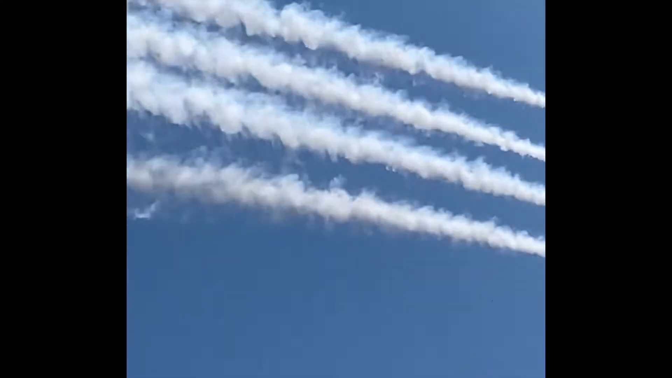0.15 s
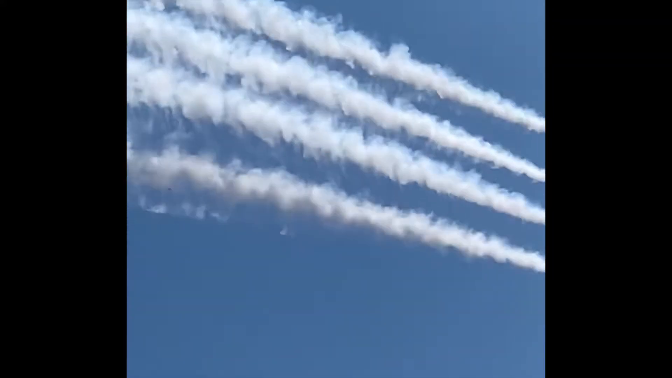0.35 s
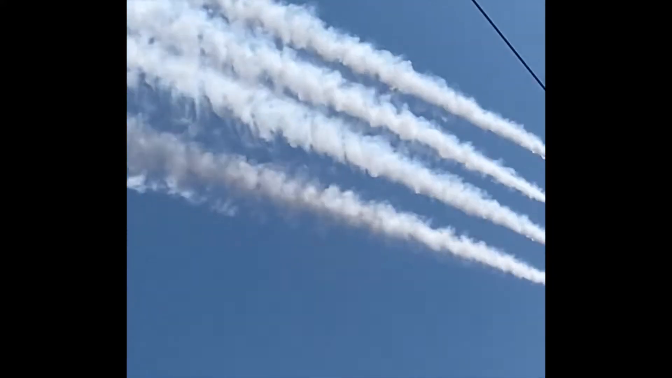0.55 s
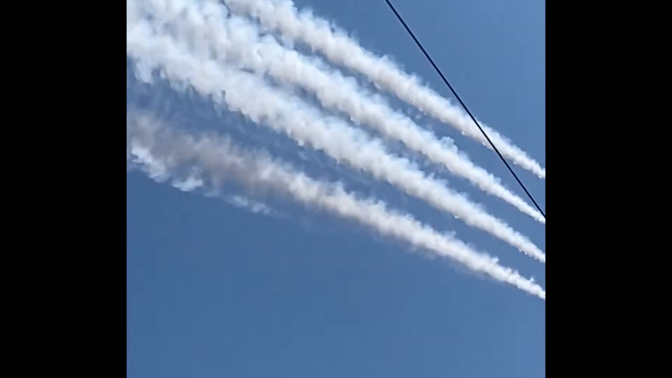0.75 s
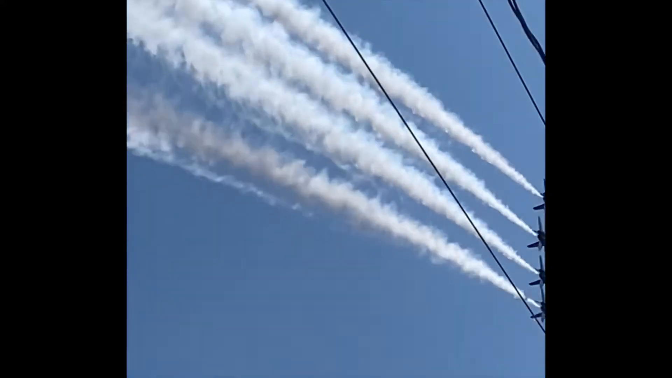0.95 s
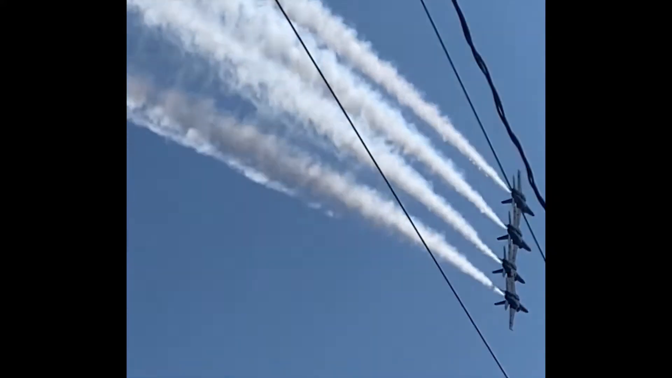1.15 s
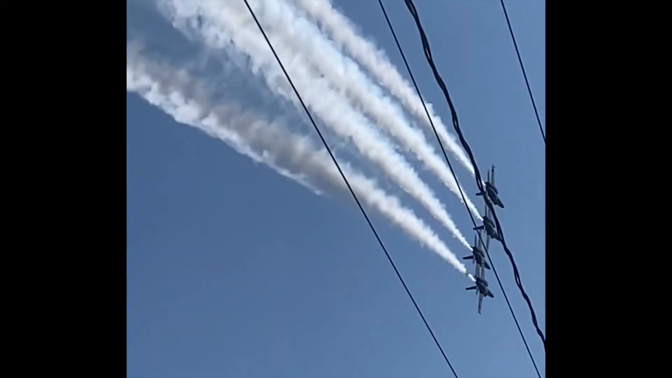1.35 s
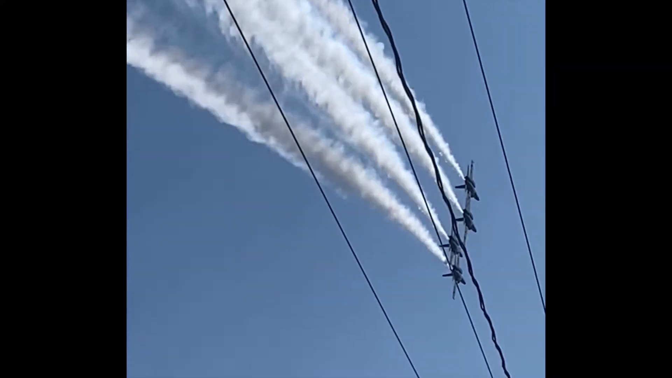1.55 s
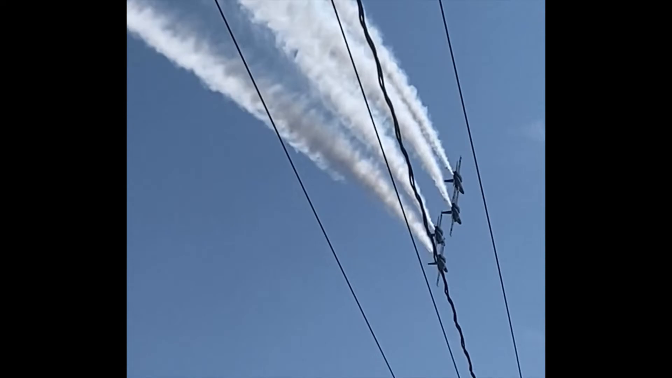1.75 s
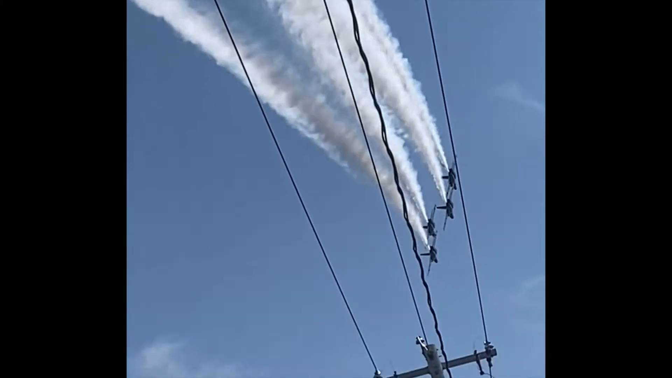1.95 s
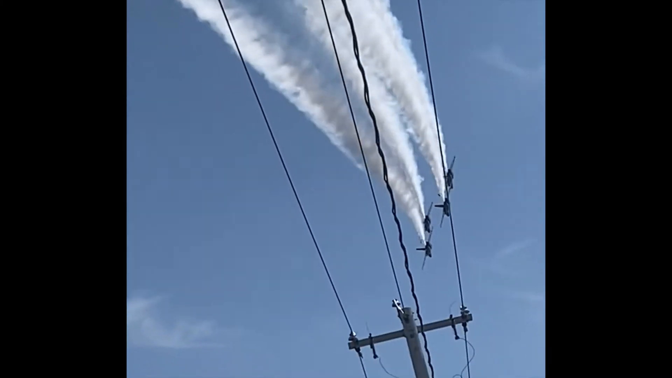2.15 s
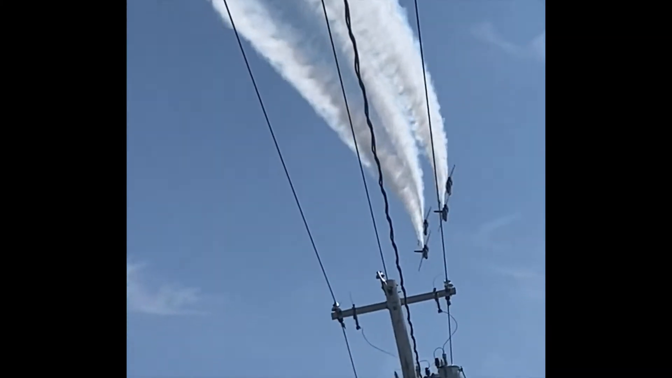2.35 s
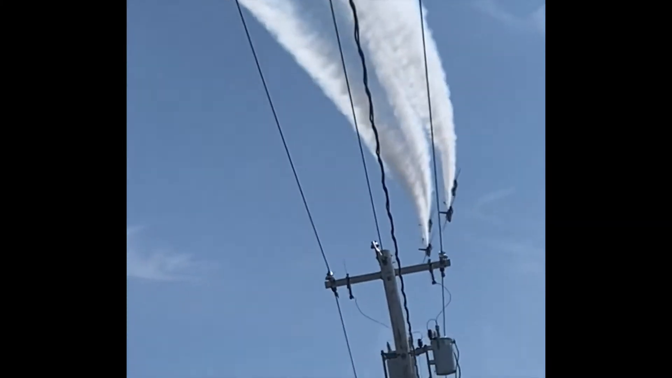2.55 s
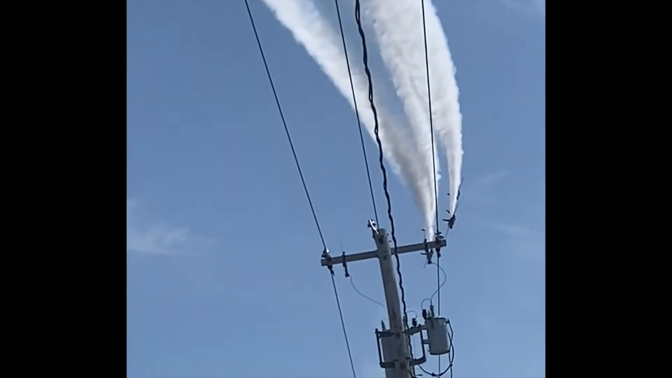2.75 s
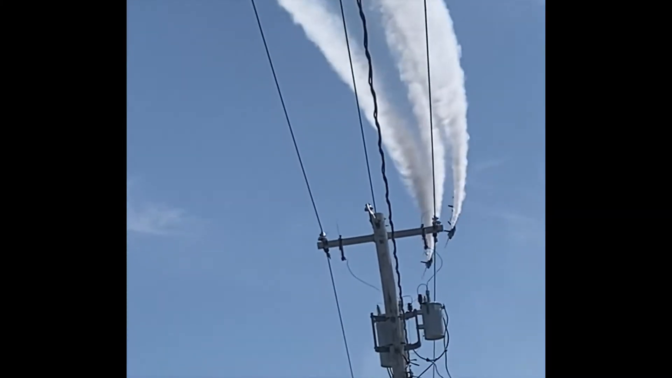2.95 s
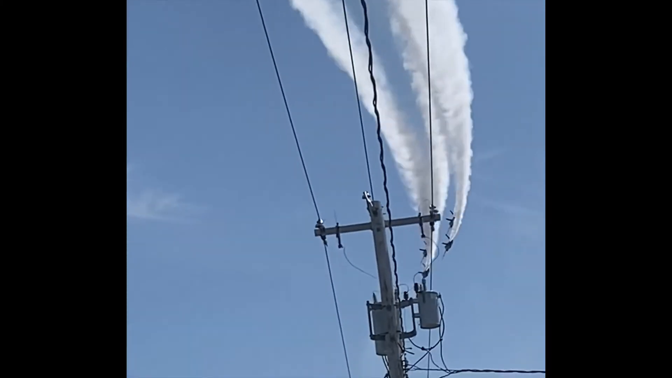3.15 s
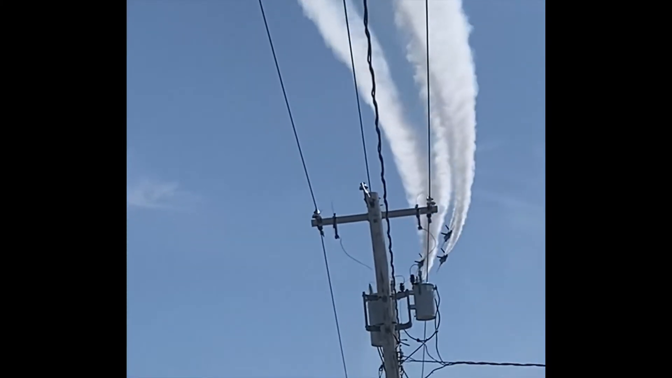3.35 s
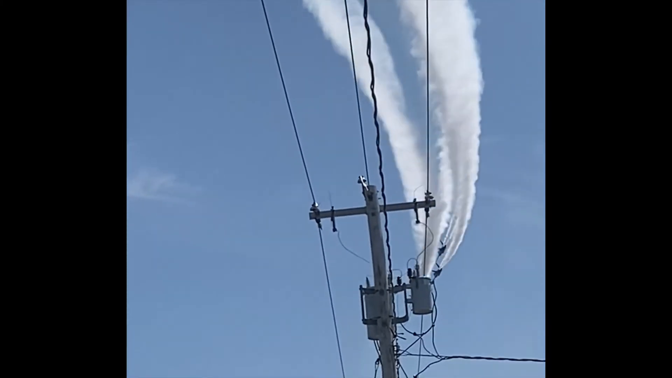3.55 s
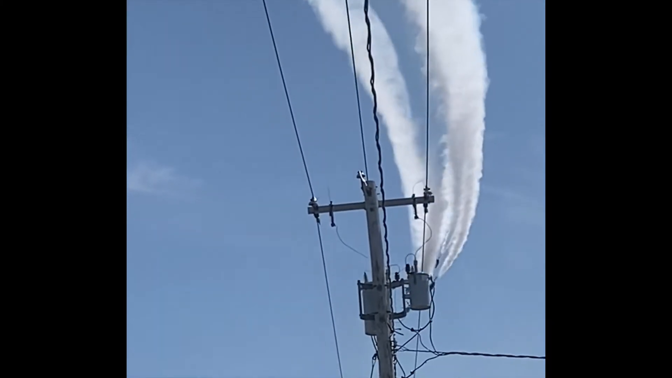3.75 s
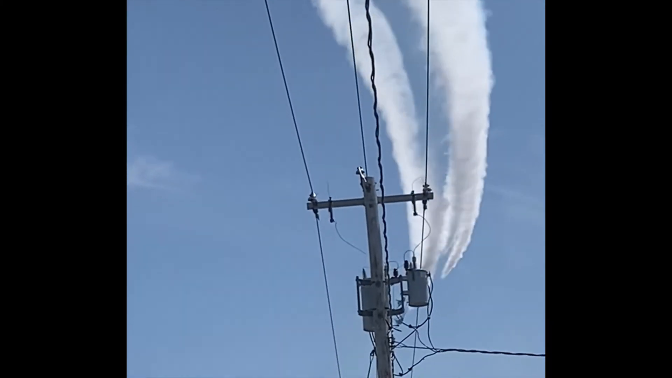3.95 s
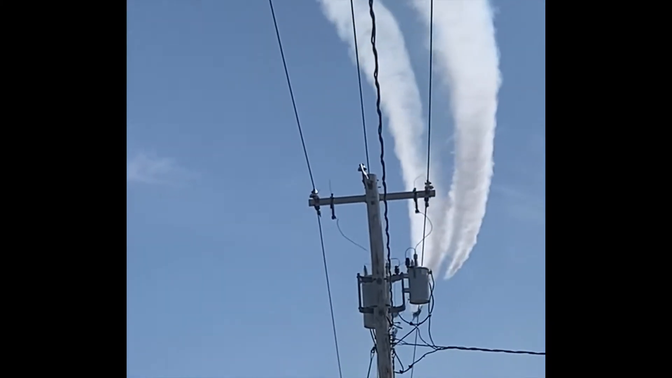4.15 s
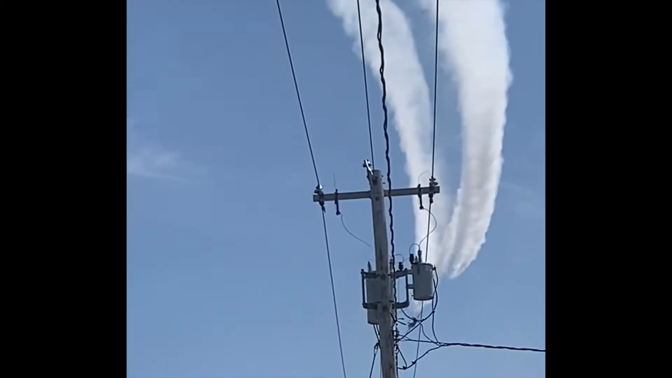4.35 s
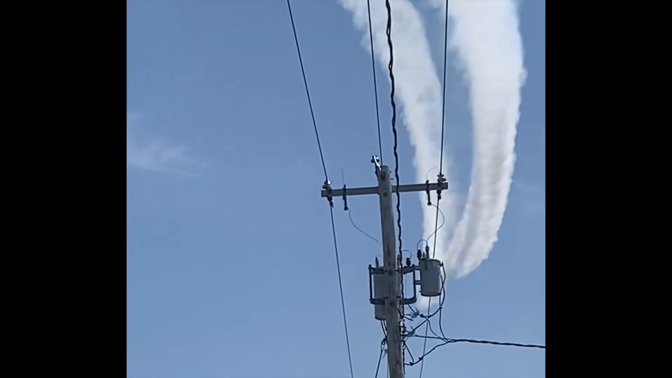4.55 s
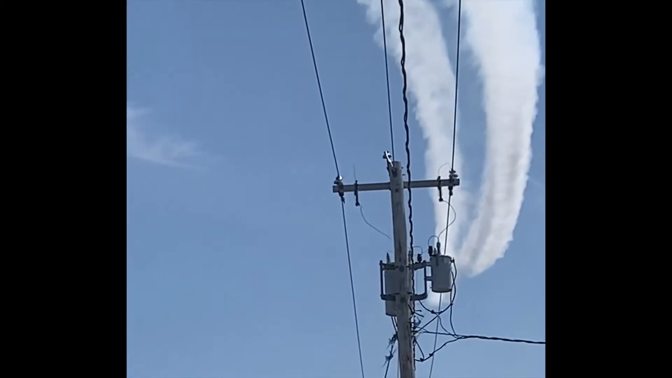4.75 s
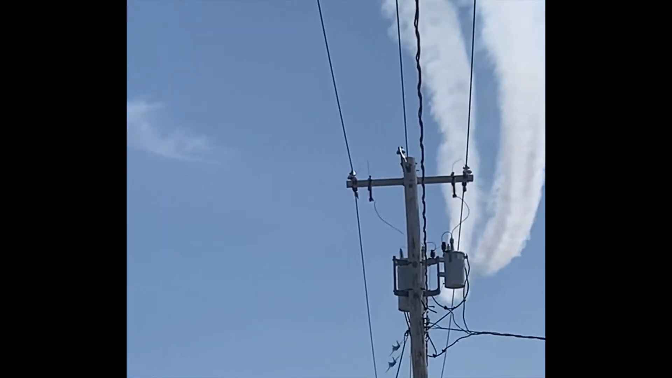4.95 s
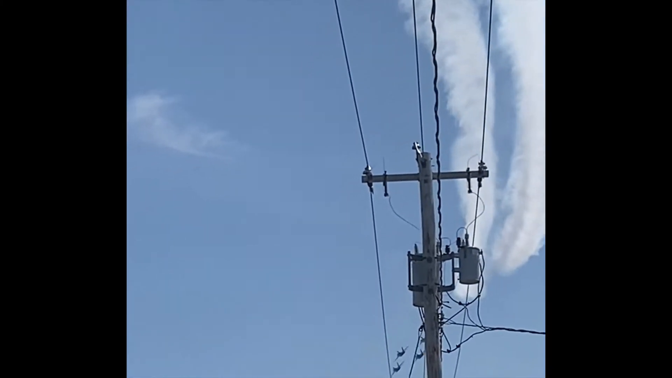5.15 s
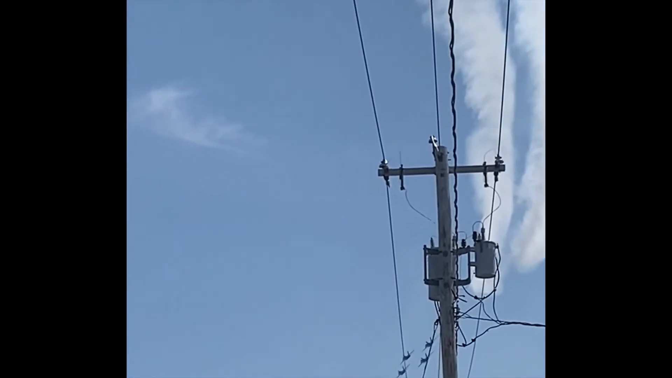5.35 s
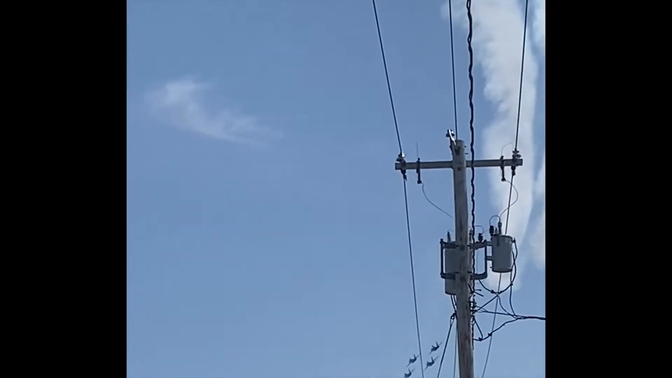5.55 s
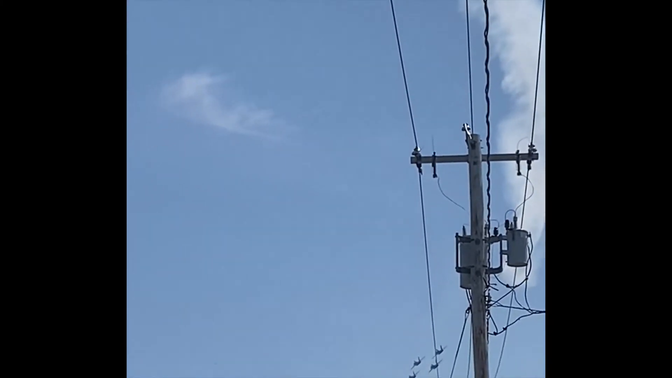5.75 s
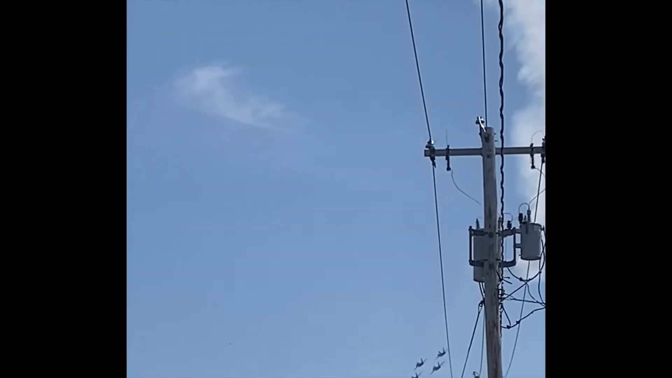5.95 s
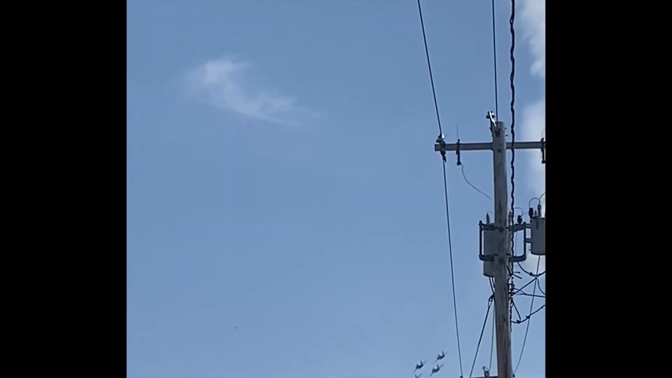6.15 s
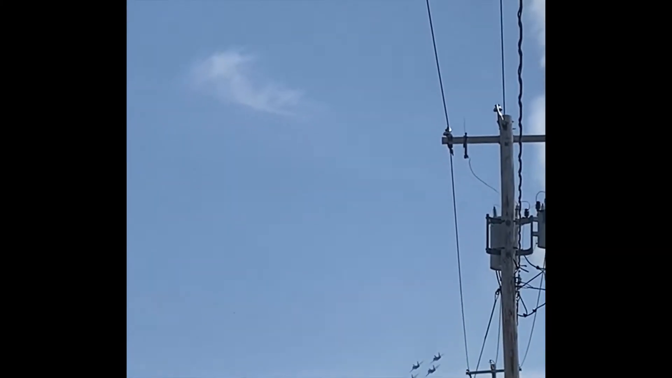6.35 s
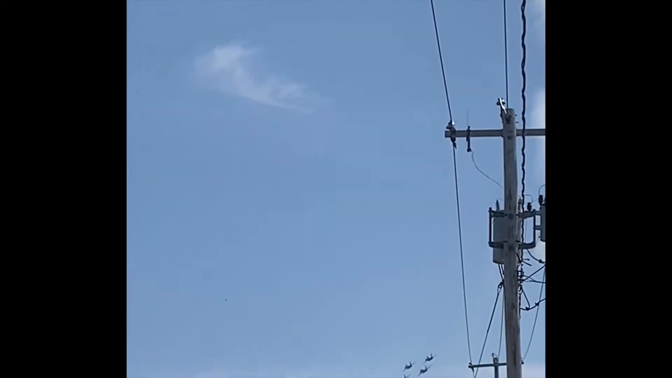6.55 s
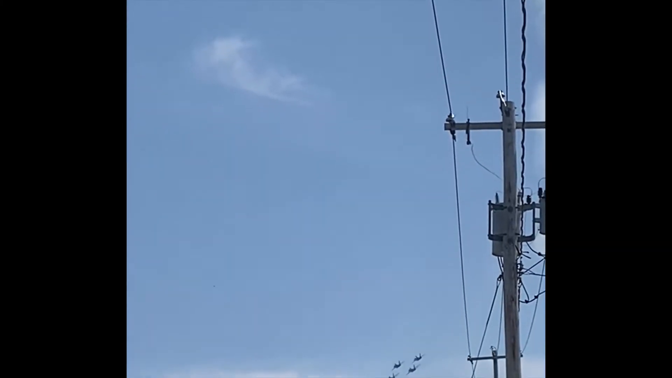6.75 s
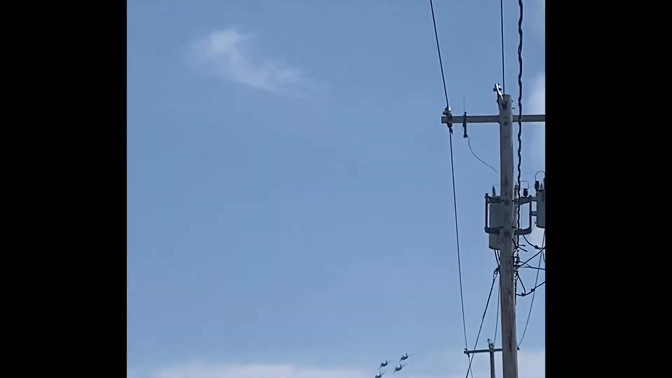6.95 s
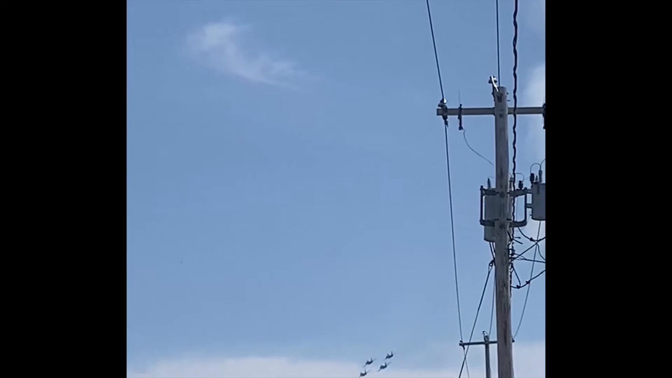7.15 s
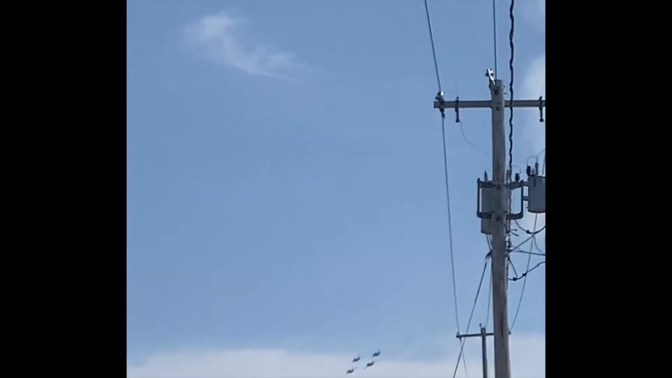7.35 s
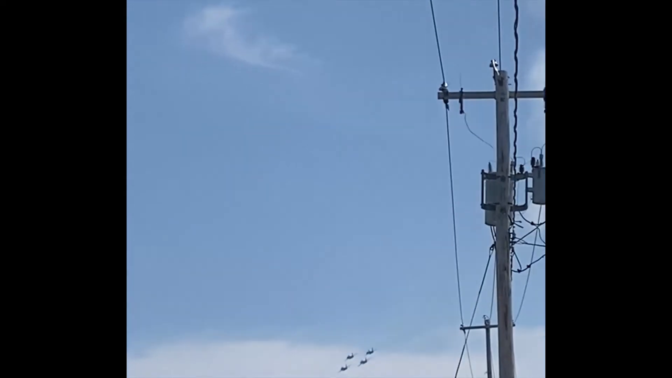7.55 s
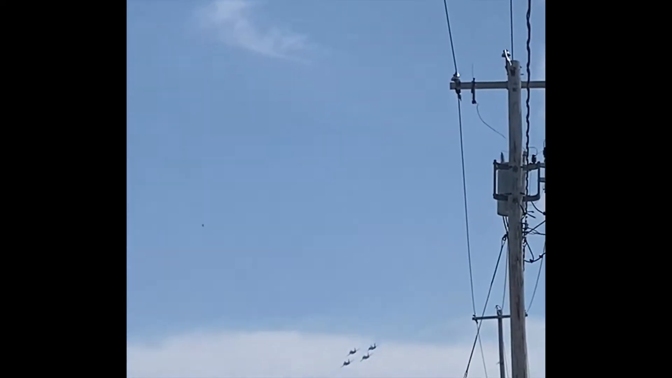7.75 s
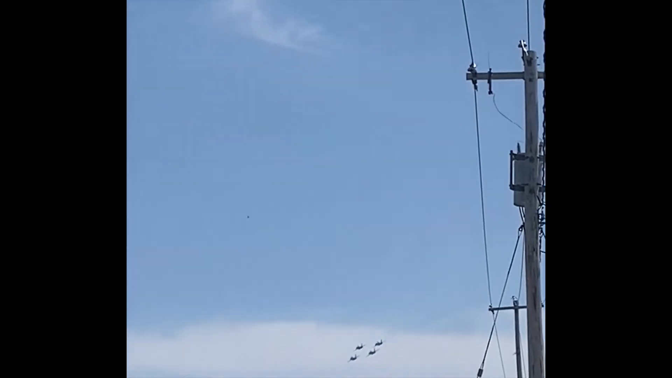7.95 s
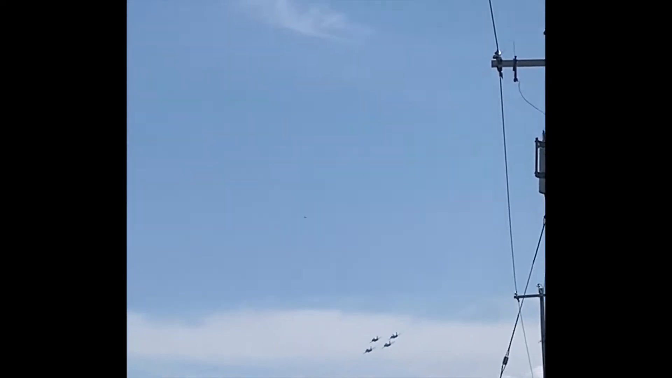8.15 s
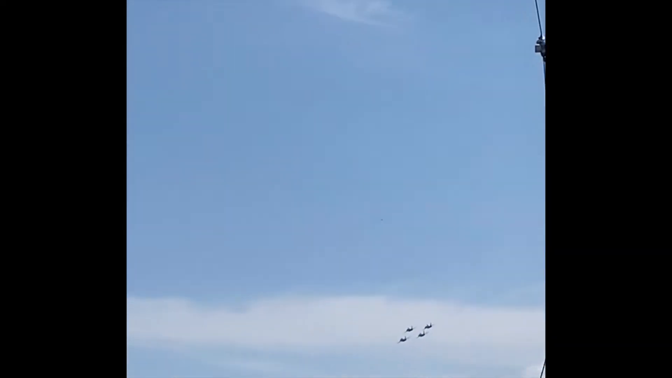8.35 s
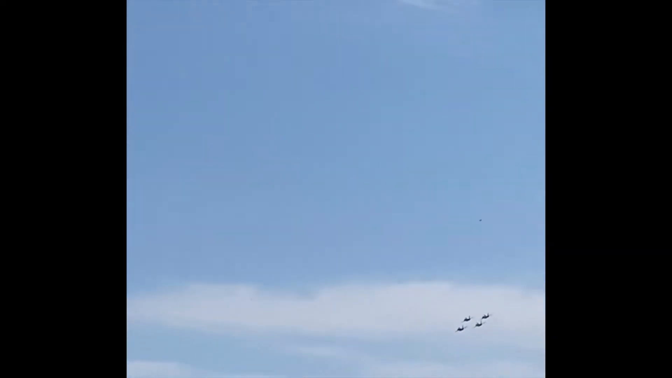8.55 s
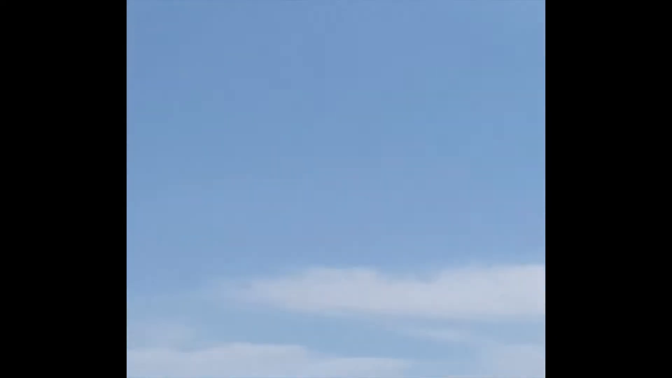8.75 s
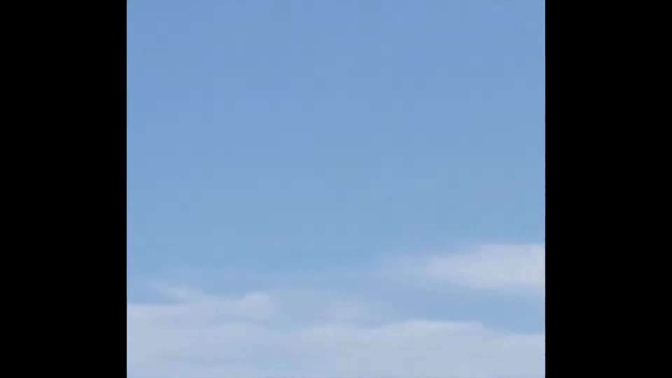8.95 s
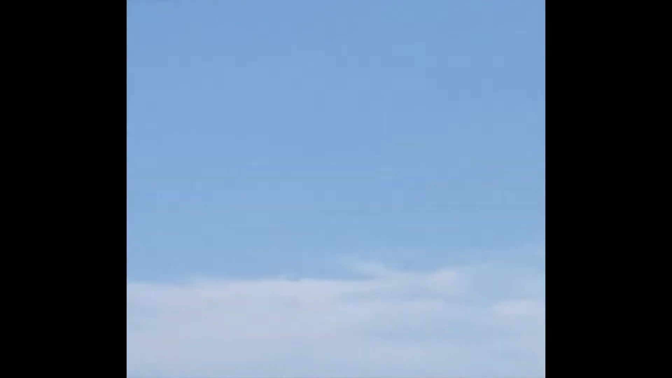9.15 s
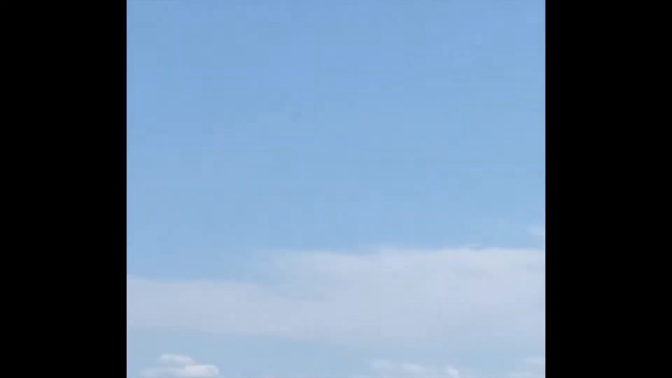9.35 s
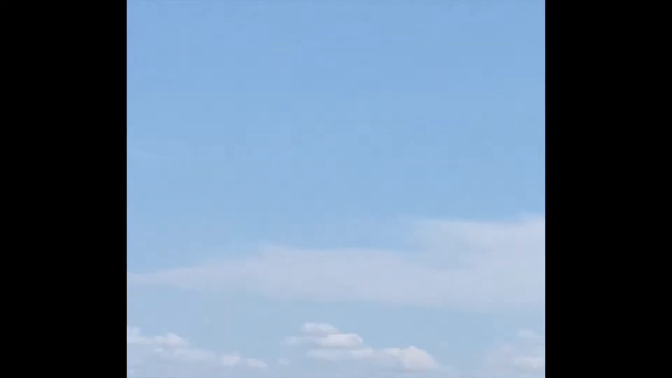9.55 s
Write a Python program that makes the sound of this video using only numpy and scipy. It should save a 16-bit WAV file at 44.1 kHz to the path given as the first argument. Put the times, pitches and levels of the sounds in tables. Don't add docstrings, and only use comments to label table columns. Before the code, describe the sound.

A tight formation of jets tears past overhead with a harsh crackling roar, then dulls to a distant rumble as leaves rustle and birds whistle.

```python
import sys
import numpy as np
from scipy import signal
from scipy.fft import rfft, irfft
from scipy.io import wavfile
from scipy.ndimage import uniform_filter1d, map_coordinates

SR = 44100
rng = np.random.default_rng(int(sys.argv[2]) if len(sys.argv) > 2 else 0)


def pcm_store(signal):
    levels = np.round(np.clip(np.atleast_2d(signal), -1, 1) * 32767)
    wavfile.write(sys.argv[1], SR, levels.astype(np.int16).T)


def invert_db(level):
    return 10 ** (np.asarray(level, dtype=float) / 20)


N = 427769
HZ = np.arange(N // 2 + 1) * SR / N


def on_log(hz, table):
    points, values = np.transpose(table)
    return np.interp(np.log(hz + 1), np.log(points), values)


def curves(table):
    s, *columns = np.transpose(table)
    return [np.interp(np.arange(N) / SR, s, column) for column in columns]


def swells(table):
    t = np.arange(N) / SR
    return sum(db * np.exp(-((t - s) / half_s) ** 2) for s, db, half_s in table)


def unit(x):
    return x / np.sqrt(np.mean(x ** 2))


def walk(rate_hz):
    hold = int(SR / rate_hz)
    steps = np.repeat(rng.standard_normal(N // hold + 1), hold)
    return unit(uniform_filter1d(uniform_filter1d(steps, hold), hold)[:N])


# (time [s], loudness [dB], brightness lost to the air [dB])
JETS = [(0, -20, -2), (0.2, -19.5, -8.5), (0.42, -23, -6), (0.55, -19, -14.5), (0.68, -20, -15.5),
        (0.8, -18.5, -14.5), (1.2, -19.5, -15.5), (1.6, -18, -22), (2, -22.5, -20), (2.6, -19.5, -26.5),
        (3.2, -23.5, -23), (4, -25.5, -26), (5, -28.5, -21), (6, -29.5, -24), (7, -29.5, -30),
        (8, -30, -33.5), (8.6, -32.5, -27.5), (9.1, -28.5, -32.5), (9.69, -24, -33)]
# (time [s], gain [dB], half length [s])
SURGES = [(.04, -1, 0.042), (.08, -2.5, 0.033), (.225, 3.5, 0.011), (.265, 2.5, 0.011), (.4, 2, 0.039),
          (.49, 2.5, 0.027), (.56, 1, .04), (.31, 4, 0.092), (.62, 5.5, 0.021), (.93, 4, 0.11),
          (1.16, 1, .04), (1.4, 4, 0.031), (1.85, 1.5, 0.082), (2.55, 4.5, 0.12), (2.97, 0.5, 0.08),
          (3.3, 0.5, .1), (3.62, 2, 0.087), (3.75, -0.5, 0.15), (4.3, -1.5, 0.12), (4.6, 0, 0.12),
          (7.5, 0, 0.082), (8.8, 1, .3), (9.2, 1.5, 0.12)]
# (level at nearest pass [dB], slope on loudness [dB/dB], slope on brightness [dB/dB])
LAYERS = [
    (-31, -0.3751, 0.0636),
    (-24, 1.04, 0.0475),
    (-16.5, 1.0551, 0.2533),
    (-20, 0.4, 0.5),
    (-19, 0.53, 0.7865),
    (-28, 1.1656, 0.9173),
]
NEAR_LOUD_DB, NEAR_BRIGHT_DB = -19, -8


def layer_levels():
    loud_db, bright_db = curves(JETS)
    loud_db = loud_db - NEAR_LOUD_DB
    bright_db = bright_db - NEAR_BRIGHT_DB + swells(SURGES)
    return np.array([db + a * loud_db + b * bright_db for db, a, b in LAYERS])


LAYER_HZ = [70, 150, 270, 550, 1050, 3000]
# (frequency [Hz], level per third octave [dB])
EXHAUST = [(22, -57.5), (32, -31.5), (45, -29), (63, -9), (110, -5.5), (200, -5), (330, -8.5), (600, -7.5),
           (1000, -10), (1700, -6), (2300, -5.5), (3000, -7.5), (4400, -9), (6500, -20), (7800, -28),
           (9500, -37), (11500, -48)]
# (time [s], gain [dB], half length [s])
RETURN = [
    (9.6, 4, 1.8),
]
# (frequency [Hz], share of the return gain [1])
RETURN_COLOUR = [(60, 1.2), (150, 0.5), (300, 1.1), (500, -0.28), (750, -0.18), (1400, 1.33), (2600, -0.55)]
# (time [s], gain [dB], half length [s])
TREBLE_SWELLS = [
    (.55, 1, 0.5),
    (2.5, -3, 0.13),
    (5.1, -6.5, 0.36),
    (5.9, -10.5, 0.55),
    (9.0, 11, 0.65),
]
# (time [s], centre [Hz], gain [dB], half length [s])
ROAR_PATCHES = [(.08, 230, -7, 0.13), (.1, 600, 2, 0.19), (.5, 720, 3, .25), (1.1, 1800, -2, 0.8),
                (2.1, 170, 2.5, 0.37), (2.2, 2000, -1, 0.22), (2.5, 620, -3.5, 0.5), (2.7, 2200, 1, 0.42),
                (3.7, 1150, -3, 0.22), (3.6, 400, 4, .3), (4.4, 140, 4.5, .3), (5.2, 2200, -3, .4),
                (5.7, 1400, 3, 0.28), (5.5, 550, 2, 0.63), (6.2, 1000, 0, 0.21), (7.2, 2000, 2, 0.3),
                (8.2, 700, -1, 0.79), (8.7, 1500, -5, .2), (8.8, 2200, 4, 0.39), (9.5, 700, 4.5, 0.43),
                (9.6, 80, 2.5, .2), (8.5, 80, 3, .2), (0.64, 400, 2.5, .15), (2.75, 240, 3.5, 0.3),
                (2.05, 430, -3.5, 0.23), (8.8, 350, -4, 0.35), (5.3, 800, -3, 0.2), (3.3, 3200, 4, .15),
                (4.8, 3700, -2.5, .4), (3.9, 2500, 2, .3), (1.7, 4500, 2.5, .2), (0.34, 1500, 1.5, 0.069),
                (0.2, 100, -3.5, .1), (7.3, 130, -3.5, 0.088), (2.3, 300, 2.5, .2), (9.3, 650, 1, 0.33),
                (5, 3300, 2.5, .3), (2.2, 70, -5, .4), (3.3, 70, 1, .2)]
ROAR_PATCH_OCTAVES = 0.34
AIR_STRETCH, NEAR_HISS_DB = 0.69, -27.5


def exhaust():
    surge_db, flicker_db, steepen = 1.1, 0.7, 0.012
    levels, surge = layer_levels(), walk(9.8)
    noise = rfft(rng.standard_normal(N))
    nose_on, treble_db = swells(RETURN), swells(TREBLE_SWELLS)
    centres_hz = np.array(ROAR_PATCHES)[:, 1]
    roar_patches = np.array([swells([(s, db, half_s)]) for s, _, db, half_s in ROAR_PATCHES])
    out = 0
    for hz in 22 * 2 ** (np.arange(28) / 3):
        band = np.cos(np.pi / 2 * np.clip(3 * np.log2((HZ + 1) / hz), -1, 1)) ** 2
        weights = np.array([on_log(hz, list(zip(LAYER_HZ, row))) for row in np.eye(len(LAYER_HZ))])
        db = on_log(hz, EXHAUST) + weights @ levels
        db = db + surge_db * min(hz / 4000, 1) * surge + flicker_db * walk(6.0)
        db = db + AIR_STRETCH * max(np.log2(hz / LAYER_HZ[-1]), 0) * (levels[-1] - NEAR_HISS_DB)
        db = db + on_log(hz, RETURN_COLOUR) * nose_on
        db = db + np.clip(np.log2(hz / 2500), 0, 1) * treble_db
        db = db + np.exp(-(np.log2(hz / centres_hz) / ROAR_PATCH_OCTAVES) ** 2) @ roar_patches
        out = out + invert_db(db) * unit(irfft(noise * band, N))
    size = np.sqrt(uniform_filter1d(out ** 2, SR // 4))
    return out + steepen * (out ** 2 / size - size)


# (time [s], extra path [ms], bass in step [0-1], treble in step [0-1])
BOUNCE = [(0, 5.58, .35, .3), (.4, 4.95, .6, .2), (.7, 4.35, .7, .25), (1.0, 3.93, .7, .3),
          (1.6, 3.22, .75, .55), (2.2, 2.74, .8, .85), (2.8, 2.34, .95, .5), (3.4, 2.1, .6, .3),
          (3.8, 1.86, .5, .1), (4.3, 1.68, .2, .5), (4.7, 1.54, .1, .6), (5.2, 1.45, .15, .15),
          (5.8, 1.4, .4, .4), (6.6, 1.3, .65, .15), (7.6, 1.3, .35, .05), (8.5, 1.16, .5, .05),
          (9.1, 1.18, .55, .15), (9.7, 1.2, .65, .15)]
# (frequency [Hz], level returned in step [dB])
GROUND = [(100, -9), (190, -4), (300, 0.5), (1000, -0.5), (1500, -3.5), (2500, -7), (5000, -18)]
BOUNCE_SPLIT_HZ = 650
SOFT_GROUND_RAD = 0.5


def ground(direct):
    lag_ms, bass, treble = curves(BOUNCE)
    lag_ms = uniform_filter1d(lag_ms, SR // 5) + 0.022 * walk(5.0) + 0.015 * walk(1.0)
    soil = np.exp(1j * SOFT_GROUND_RAD / (1 + (HZ / 1400) ** 2))
    dull = irfft(rfft(direct) * invert_db(on_log(HZ, GROUND)) * soil, N)
    late = map_coordinates(dull, [np.arange(N) - lag_ms * SR / 1000], order=3, mode="wrap")
    low = irfft(rfft(late) / (1 + (HZ / BOUNCE_SPLIT_HZ) ** 4), N)
    return direct + bass * low + treble * invert_db(1.2 * walk(4.0)) * (late - low)


# (frequency [Hz], width [Hz], level [dB])
THIN_BANDS = [(11700, 140, -93.5), (12260, 110, -93)]
# (time [s], gain [dB], half length [s])
THIN_BANDS_EARLY = [
    (.6, 6, 1.6),
]


def thin_bands():
    noise = rfft(rng.standard_normal(N))
    out = 0
    for hz, width_hz, db in THIN_BANDS:
        band = np.exp(-((HZ - hz) / width_hz) ** 2)
        out = out + invert_db(db) * unit(irfft(noise * band, N))
    return invert_db(swells(THIN_BANDS_EARLY)) * out


# (time [s], peak [dB])
CRACKS = [(.217, -17.5), (.266, -15), (.279, -16), (.34, -18), (1.68, -19.5), (2.645, -17.5), (3.254, -23),
          (3.38, -21.5), (4.167, -27.5), (4.255, -26.5), (5.868, -33)]
CRACK_S, CRACK_HZ = 0.004, 1100


def cracks():
    t = np.arange(800) / SR
    out = np.zeros(N)
    for (s, db), burst in zip(CRACKS, rng.standard_normal((len(CRACKS), len(t)))):
        i = int(s * SR)
        out[i:i + len(t)] += invert_db(db + 9.5) * burst * np.exp(-t / CRACK_S)
    colour = np.minimum(HZ / 350, 1) ** 2 / (1 + (HZ / CRACK_HZ) ** 2) / (1 + (HZ / 4000) ** 6)
    return irfft(rfft(out) * colour, N)


# (time [s], gain [dB], half length [s])
RUSTLE = [(2.68, 8.5, 0.29), (4.5, 9, 0.45), (5.3, 3, 0.31), (6.75, 4, 0.4), (7.43, 5, 0.19),
          (9.0, 10, 0.45), (9.5, 4, 0.38), (4.1, 3, 0.023), (4.19, 2, .03), (8.64, 3.5, .03),
          (9.205, 3, 0.006), (9.378, 6, 0.0055), (9.1, 4.5, 0.0073), (9.3, 2.5, 0.13)]
# (time [s], peak [dB])
TICKS = [(0.2362, -39.5), (0.8147, -56.5), (1.2165, -56), (.6, -54), (.36, -48.5), (1.396, -70),
         (2.311, -60), (2.433, -62.5), (3.097, -62.5), (4.086, -53.5), (4.154, -62.5), (4.193, -59),
         (6.4564, -58.5), (6.786, -67), (6.826, -60.5), (6.899, -56.5), (7.397, -72), (7.4245, -66.5),
         (7.511, -62), (7.5797, -59.5), (7.6583, -60), (7.19, -65), (7.9, -65), (5.9243, -68.5),
         (7.7146, -60.5), (7.8231, -58.5), (8.3826, -69.5), (8.5415, -65.5), (8.577, -59), (8.638, -61),
         (8.696, -65), (8.9047, -62.5), (8.989, -61.5), (9.1017, -58), (9.2024, -54), (9.3754, -60),
         (9.435, -61)]
# (frequency [Hz], level per Hz [dB])
LEAVES = [(1500, -15.5), (3000, 5), (5000, 7.5), (7000, 3.5), (9000, -0.5), (12300, -5.5), (13400, -29.5),
          (15000, -13)]
CALM_DB = -87
SNAP_DB_PER_OCTAVE = 8.5


def leaves():
    grain_db, tick_s = 1.3, 0.001
    grains = invert_db(grain_db * rng.exponential(size=N // 64 + 1)).repeat(64)[:N]
    level_db = CALM_DB + swells(RUSTLE) + 10.5 + 1.2 * walk(15.0)
    hiss = unit(grains * rng.standard_normal(N)) * invert_db(level_db)
    t = np.arange(400) / SR
    ticks = np.zeros(N)
    for (s, db), burst in zip(TICKS, rng.standard_normal((len(TICKS), len(t)))):
        i = int(s * SR)
        ticks[i:i + len(t)] += invert_db(db + 9.0) * burst * t / tick_s * np.exp(-t / tick_s)
    snap = invert_db(SNAP_DB_PER_OCTAVE * np.log2((HZ + 1) / 10000))
    return irfft((rfft(hiss) + rfft(ticks) * snap) * invert_db(on_log(HZ, LEAVES)), N)


# (time [s], gain [dB], half length [s])
BREEZE = [(2.45, 36, .04), (5.05, 44, 0.07), (5.33, 36, .07), (5.6, 46, 0.18), (6.0, 28, 0.13),
          (6.4, 41.5, 0.4), (7.15, 47.5, 0.5), (7.8, 39, 0.37), (8.58, 42, .06), (8.85, 45, 0.14),
          (9.2, 42, .07), (9.37, 42, 0.07), (9.65, 42, 0.066)]
BREEZE_CALM_DB, BREEZE_HZ = -99, 260


def breeze():
    buffet_db = 5.5
    colour = np.minimum(HZ / 55, 1) ** 3 / (1 + (HZ / BREEZE_HZ) ** 3)
    low = unit(irfft(rfft(rng.standard_normal(N)) * colour, N))
    return low * invert_db(BREEZE_CALM_DB + swells(BREEZE) + buffet_db * walk(14.0))


# (start [s], length [s], start [Hz], end [Hz], level [dB], how early the glide settles [1])
CHIRPS = [
    (6.16, .05, 5100, 5400, -75, 1),
    (6.80, 0.4, 5450, 4490, -70.5, 2.8),
    (6.94, .21, 4520, 4290, -74, 1.5),
    (6.93, .21, 5060, 4780, -76, 2),
    (7.65, .05, 4500, 4640, -74.5, .5),
    (7.77, .09, 4180, 3720, -70.5, -.5),
    (7.97, .145, 4840, 5090, -76, 1),
    (8.04, .075, 5760, 5870, -79, 1),
    (8.01, .13, 3800, 3900, -81, 1),
]


def birds():
    waver, blur_hz = invert_db(2.2 * walk(45.0)), 36.0 * walk(300.0)
    out = np.zeros(N)
    for s, length_s, start_hz, end_hz, db, ease in CHIRPS:
        u = np.linspace(0, 1, int(length_s * SR))
        i = int(s * SR)
        glide = np.expm1(-ease * u) / np.expm1(-ease)
        hz = start_hz + (end_hz - start_hz) * glide + blur_hz[i:i + len(u)]
        swell = np.sin(np.pi * u ** 1.3) ** 0.4
        out[i:i + len(u)] += invert_db(db) * swell * np.sin(2 * np.pi * np.cumsum(hz) / SR)
    return (out + 0.3 * np.roll(out, SR // 30) + 0.12 * np.roll(out, SR // 15)) * waver


EDGE_S = 0.004


def scene():
    air = ground(exhaust()) + leaves() + cracks() + birds() + thin_bands()
    t = np.arange(N) / SR
    edge = np.clip(np.minimum(t, t[-1] - t) / EDGE_S, 0, 1)
    air = air * np.sin(np.pi / 2 * edge) ** 2
    return np.array([air, air])


# (frequency [Hz], level [dB])
PORT_APART = [(180, -62), (310, -22), (600, -15), (1200, -7), (2200, -20), (4000, -16), (6500, -15),
              (7600, -15), (9300, -7)]


def scattered(spectrum):
    decay_s = 0.05
    tails = rng.standard_normal((2, 8192)) * np.exp(-np.arange(8192) / SR / decay_s)
    tails = tails / np.sqrt(np.sum(tails ** 2, axis=1, keepdims=True))
    a, b = irfft(spectrum * rfft(tails, N) * invert_db(on_log(HZ, PORT_APART)), N)
    turn_rad = 1.2 * walk(2.0)
    return rfft(a * np.cos(turn_rad) + b * np.sin(turn_rad) + breeze())


# (frequency [Hz], level under the roar [dB])
MASK = [(7000, -70), (7550, -73), (7900, -84), (8500, -85), (10300, -86), (11500, -82)]
MASK_SCATTER_DB = 5


def masked(x):
    hz, _, z = signal.stft(x, SR, nperseg=2048)
    power = np.abs(z[0]) ** 2 + np.abs(z[1]) ** 2
    patches = rng.standard_normal((257, z.shape[2] // 2 + 1)).repeat(4, 0).repeat(2, 1)
    patches = patches[:len(hz), :z.shape[2]]
    limit_db = on_log(hz, MASK)[:, None] + MASK_SCATTER_DB * patches
    limit = uniform_filter1d(power.sum(axis=0), size=12) * invert_db(2 * limit_db)
    treble = ((hz > 7000) & (hz < 11600))[:, None]
    drop = (uniform_filter1d(power, size=4, axis=0) < limit) & treble
    return signal.istft(z * ~drop, SR, nperseg=2048)[1][:, :N]


def band_limit(x):
    return signal.sosfilt(signal.butter(12, 15750, fs=SR, output="sos"), x)


# (frequency [Hz], left minus right [dB])
PORT_TILT = [(300, 0), (600, 2), (1000, 5), (1400, 4.8), (1900, 1.2), (2600, 0)]
# (frequency [Hz], left lead [rad])
PORT_LEAD = [(0, 0), (150, 0), (200, .02), (250, .07), (320, .22), (780, .4), (1500, -.15), (2450, .7),
             (3450, .15), (4400, .85), (5050, .2), (6000, 1.6), (7000, 3.14), (8100, 3.3), (9700, 6.28),
             (11000, 6.28), (12900, 9.42), (14600, 12.57)]


def record(dry):
    spectrum = rfft(dry[0])
    lead_rad = np.interp(HZ, *np.transpose(PORT_LEAD))
    half = invert_db(on_log(HZ, PORT_TILT) / 2) * np.exp(0.5j * lead_rad)
    scatter = scattered(spectrum)
    ports = irfft(np.array([(spectrum + scatter) * half, (spectrum - scatter) / half]), N)
    ports = ports / (1 + (ports / 0.85) ** 8) ** (1 / 8)
    mix = masked(ports)
    return band_limit(mix)


dry = scene()
out = record(dry)
pcm_store(out)
```